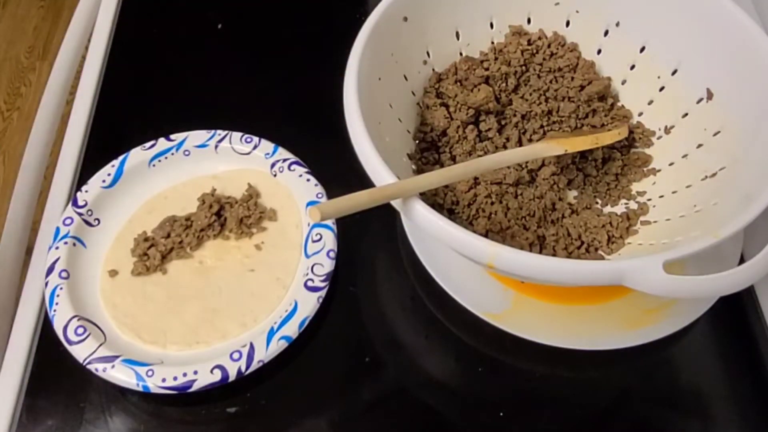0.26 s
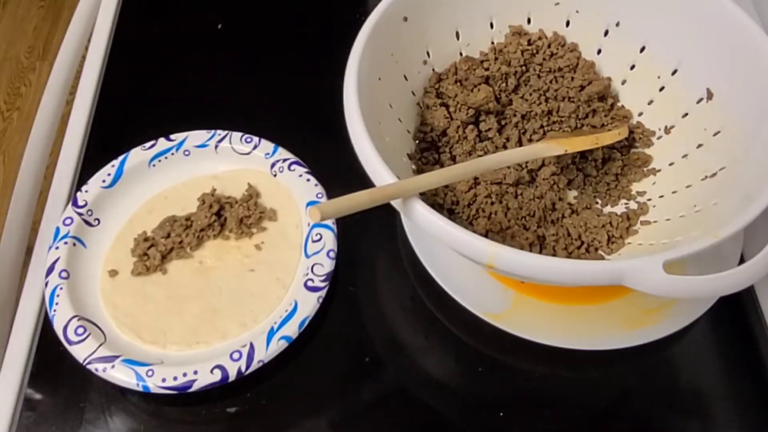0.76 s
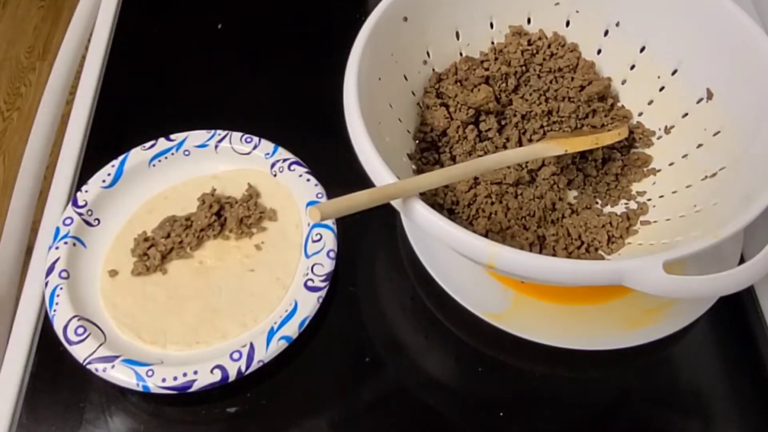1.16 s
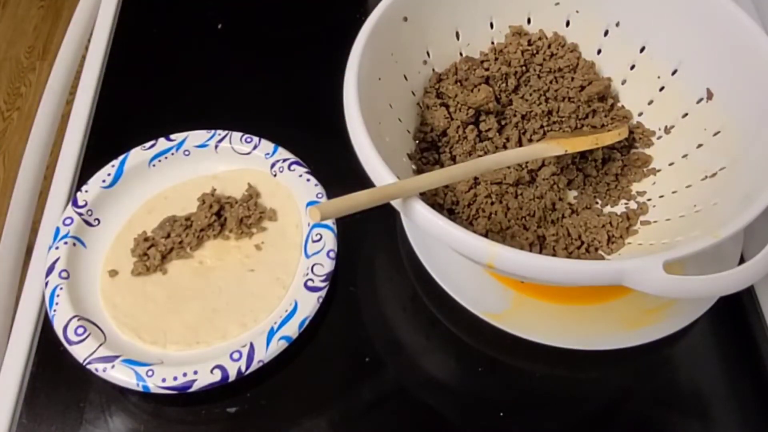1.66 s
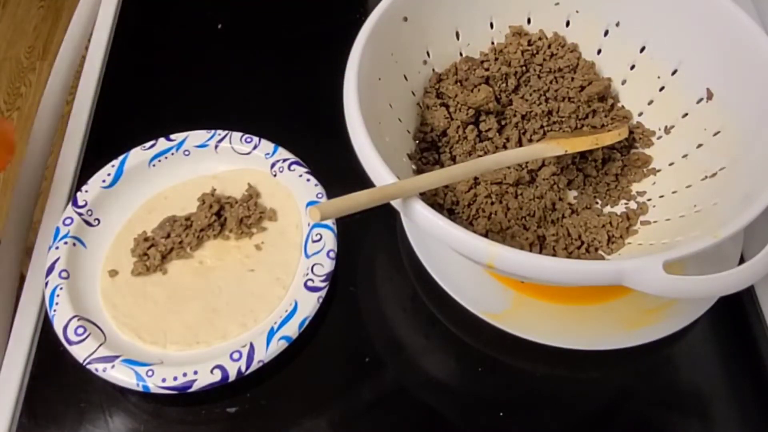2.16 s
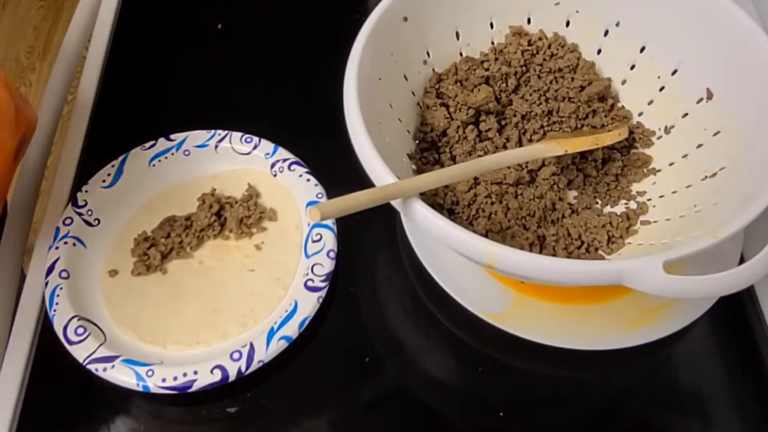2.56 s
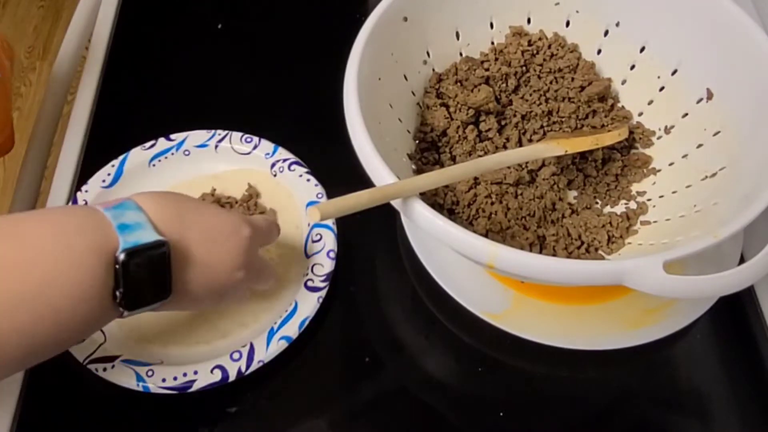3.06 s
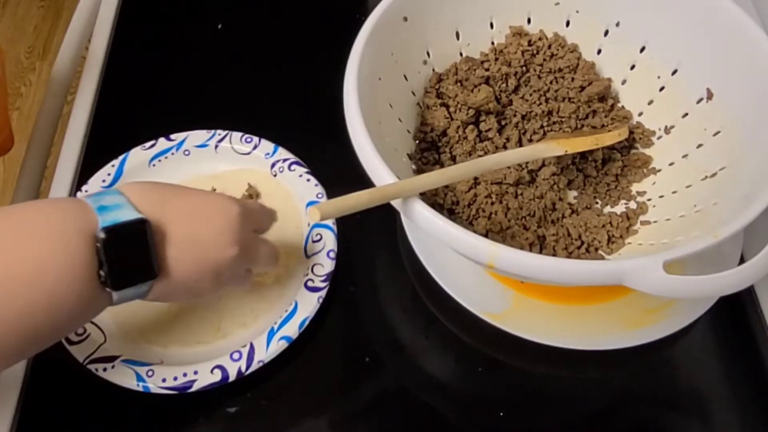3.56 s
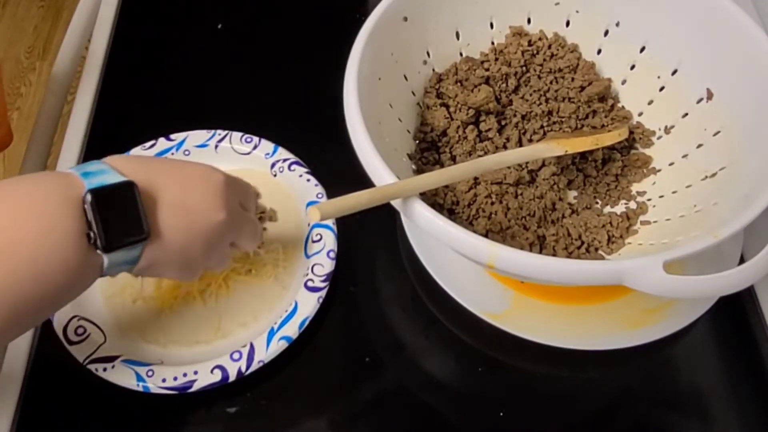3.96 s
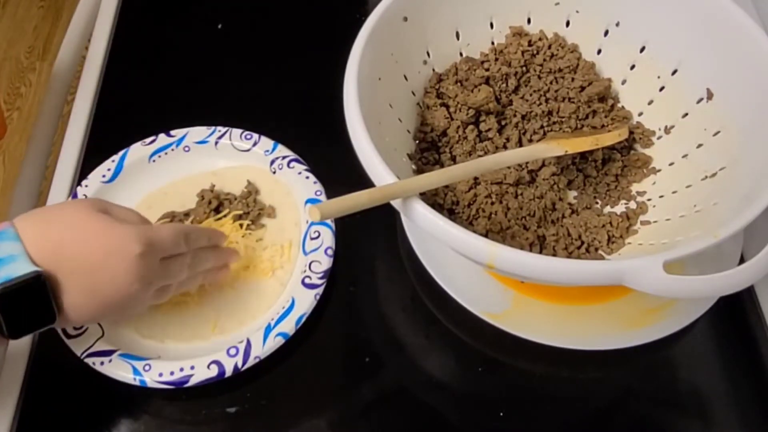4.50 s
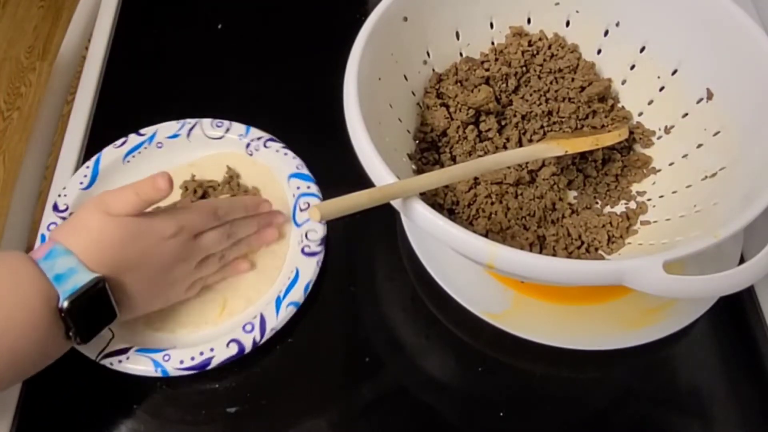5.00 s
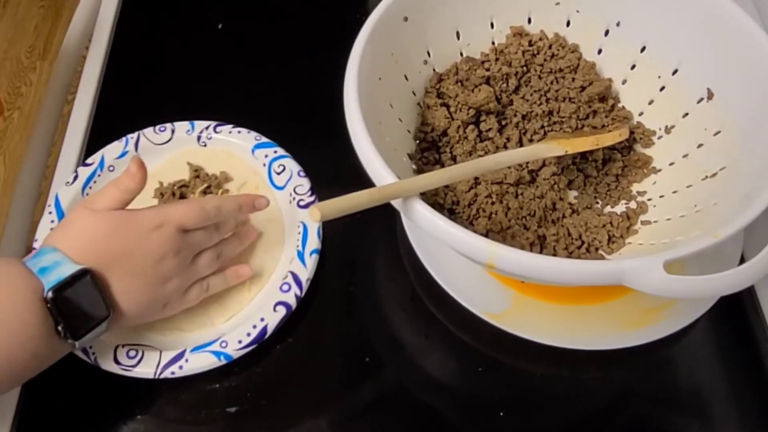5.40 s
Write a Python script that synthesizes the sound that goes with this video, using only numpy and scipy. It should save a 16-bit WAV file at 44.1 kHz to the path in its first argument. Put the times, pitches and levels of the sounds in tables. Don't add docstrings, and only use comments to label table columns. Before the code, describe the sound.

A plastic bag crackles and pops in a kitchen, soft finger pats land on a paper plate, then a heavy thud with rattling.

```python
import sys
import numpy as np
from scipy import signal
from scipy.fft import rfft, irfft
from scipy.io import wavfile
from scipy.ndimage import uniform_filter1d

SR = 44100
rng = np.random.default_rng(int(sys.argv[2]) if len(sys.argv) > 2 else 0)


def log_audio(samples):
    frames = np.atleast_2d(samples).T
    limited = np.clip(frames, -1, 1)
    pcm = np.round(limited * 32767).astype(np.int16)
    wavfile.write(sys.argv[1], SR, pcm)


def amplitude_ratio(level_db):
    exponent = np.asarray(level_db, float) / 20
    return 10 ** exponent


N = 248724

# pitch_hz, level_db (per Hz)
FAN_HISS = [(40, -19), (150, -3.5), (260, -9.5), (345, -10.5), (800, -0.5), (1050, -1.5), (1400, -5),
            (1750, -10), (2400, -1), (3100, -5), (5400, -4.5), (7750, -7.5), (10500, -6), (12100, 1.5),
            (15200, -6.5)]
# time_s, level_db
FAN_LEVEL = [(0.0, -49), (1.1, -48), (2.09, -47), (2.4, -49), (3.3, -50), (3.55, -51.5), (5.64, -51)]
# pitch_hz, level_db (per Hz)
FAN_HUM = [(18, -63), (30, -74), (54, -60), (91, -57), (122, 3.5), (145, 18), (183, -14.5), (221, -1),
           (260, -50), (340, -54), (570, -120)]
# pitch_hz, fade_60db_s
ROOM_FADE = [(100, 0.26), (1000, 0.17), (4000, 0.25), (15000, 0.043)]
# pitch_hz, likeness (0 to 1), right_lag_radians
MIC_LIKENESS = [(60, .995, 0), (700, .9, .2), (1030, .72, .5), (1400, .46, 1.3), (1750, .28, 1.7),
                (2050, .62, 2.9), (2400, .7, 3.1), (2800, .6, 3.3), (3400, .12, 5), (5200, .36, 6.3),
                (7700, .08, 10), (10300, .25, 14.2), (12000, .45, 17), (15000, .15, 21)]
# pitch_hz, left_minus_right_db
MIC_TILT = [(60, -1), (110, -0.5), (200, -0.5), (380, 5.5), (700, 1.5), (1290, -0.5), (2380, 4.5),
            (4400, 2.5), (8120, 6.5), (15000, 2.5)]
# start_s, level_db, contact_s
BLOWS = [
    (5.3231, -13, 0.002),
    (5.3275, -14.5, 0.00048),
    (5.329, -11.5, 0.01),
    (5.339, -7, 0.0047),
    (5.357, -27, 0.0013),
]
# pitch_hz, level_db, fade_60db_s
COUNTER_TONES = [(61.2, 6.5, 0.11), (53.8, -14, 0.74), (94, 10.5, 0.077), (125, -10.5, 0.35),
                 (150, 5, 0.088), (227, -10, 0.15), (227, -10.5, 0.085), (310, 0.5, 0.033),
                 (347, -12, 0.049), (557, -7, 0.12), (660, -8, 0.081), (793, 12.5, 0.025)]
# start_s, peak_db, low_pitch_hz, high_pitch_hz, fade_60db_s
RATTLES = [(5.283, -34, 2290, 3560, 0.14), (5.3232, -21.5, 2330, 6100, 0.043),
           (5.3279, -30, 4100, 2560, 0.1), (5.335, -36, 2100, 5030, 0.044),
           (5.3564, -26, 1800, 5160, 0.021), (5.378, -37, 2080, 6650, 0.096),
           (5.4034, -32.5, 3600, 8200, 0.03), (5.4182, -31.5, 3570, 6600, 0.1),
           (5.439, -43, 3950, 4600, 0.035), (5.459, -33, 4250, 7100, 0.087),
           (5.4684, -37, 4020, 4460, 0.035)]
# start_s, peak_db, pitch_hz, fade_60db_s
PATS = [(1.149, -44.5, 130, 0.028), (1.176, -44, 154, 0.12), (1.539, -47, 166, 0.0081),
        (1.681, -46.5, 227, 0.09), (1.796, -41, 153, 0.25), (1.831, -39, 91.5, 0.027),
        (1.829, -45, 164, 0.1), (1.848, -36.5, 173, 0.037), (1.87, -42, 91.5, 0.068),
        (2.911, -48.5, 192, 0.031), (2.968, -48, 121, 0.061), (3.02, -44.5, 149, 0.27),
        (3.063, -61, 144, 0.036)]
# start_s, peak_db, pitch_hz, fade_60db_s
TAPS = [(1.819, -36, 452, 0.021), (1.841, -36.5, 610, 0.035), (1.946, -37.5, 1107, 0.066),
        (2.888, -40, 706, 0.062), (2.969, -42, 753, 0.068), (3.019, -32, 1040, 0.037),
        (3.044, -32.5, 1020, 0.025), (3.055, -45, 875, 0.04), (3.068, -43.5, 960, 0.042),
        (3.094, -51, 850, 0.037), (3.158, -48, 1030, 0.04), (3.779, -43, 726, 0.017)]
# high_ring_db, scratch_db, fizz_db
CLICKS = [(4.363, -47, -31, 22, 31.5), (4.368, -50.5, -13, 20, 19), (4.437, -49.5, -7, 24, 24),
          (4.443, -65, 18, -1.1, -2.2), (4.492, -45.5, 5, 7, -12), (4.532, -52, -7, 19.5, 25.5),
          (4.538, -53.5, 9, 24, 31), (4.573, -58.5, -9, 24, 31.5)]
CASE_TONES = 1021, 820, 1561, 1513
# start_s, hold_s, force_db, dull_part_db (against the force)
SQUEEZES = [(.002, 0.007, -72, -12), (0.1, 0.069, -60, -3), (0.33, 0.032, -49, -10),
            (.552, 0.0062, -54, -27), (0.723, 0.023, -41, -16), (0.904, 0.37, -51.5, -20),
            (1.127, 0.035, -30, -5), (1.246, 0.0074, -40.5, -2.5), (1.281, 0.02, -42, -4.5),
            (1.43, .008, -45.5, -3), (1.483, 0.0088, -41, 3.5), (1.533, .006, -36, -7),
            (1.653, 0.01, -35, -5.5), (1.693, 0.085, -52.5, 1), (1.866, 0.058, -49.5, -15),
            (1.998, 0.013, -42, -2)]
# pitch_hz, level_db (per Hz)
FILM_TONE = [(120, -41), (200, -22), (409, -101), (933, 7.5), (1160, -14.5), (2290, 17.5), (2800, 15.5),
             (2960, -26), (3430, 13), (11900, -4.5), (16000, 6)]
# start_s, peak_db, pitch_hz, spatter_db (against the crack)
TICKS = [(.0074, -31, 12000, -3), (.162, -22, 2430, -12), (.331, -27, 9000, -15), (.3557, -25.5, 13800, -7),
         (.4016, -28, 12300, -8), (.419, -28, 12300, -4), (.7055, -23, 9900, -2), (.727, -14, 7250, -11),
         (.7444, -31, 9250, -13), (.9782, -29.5, 4030, -7), (1.0278, -24.5, 4130, -4),
         (1.045, -23.5, 5190, -11), (1.1764, -16.5, 2600, -6), (1.2724, -34, 12400, -7),
         (1.2857, -27, 2150, -8), (1.3015, -19.5, 6980, -8), (1.4267, -21, 4030, -10),
         (1.4655, -12, 10600, -16), (1.4921, -13, 7560, -8.5), (1.5023, -17, 7050, -31),
         (1.662, -18.5, 13300, -1), (1.7265, -18, 12300, -10), (1.7624, -30, 5000, 12),
         (1.7959, -20.5, 11800, -11), (1.8988, -21.5, 5800, -24), (1.9998, -14, 9300, -23),
         (2.0155, -23, 7000, -19), (2.0872, -17.5, 7100, -13), (2.1816, -25.5, 12800, -9),
         (2.4618, -33, 2500, -6)]
# start_s, peak_db, pitch_hz, spatter_db (against the crack)
POPS = [(.1297, -27.5, 3850, -9), (.2332, -28.5, 3900, -4), (.2822, -27.5, 4000, -19),
        (.3381, -21.5, 3720, -15), (.5587, -29.5, 7500, 6), (.7566, -26, 11600, -20),
        (.7934, -26.5, 4370, -27), (.8732, -32, 6990, -13), (.9078, -26, 12100, 9),
        (1.086, -26.5, 3580, -14), (1.1259, -19.5, 12200, 5), (1.1377, -21, 6620, 7),
        (1.1564, -19, 5400, 2), (1.167, -19, 3500, -11), (1.2508, -25.5, 5270, 3), (1.5314, -22, 6200, -9),
        (1.5447, -24, 5680, -10), (1.5651, -26, 2080, -8), (1.6366, -23.5, 6660, 5),
        (1.6945, -29.5, 2200, -23), (1.703, -24, 2380, 6), (1.8723, -29, 9000, -9),
        (1.979, -27.5, 2320, -9), (2.0945, -25, 7400, -4.5), (2.13, -32, 6740, -17), (2.153, -26, 6200, -4),
        (2.213, -27.5, 5760, -10), (2.2431, -24, 1970, -0.5), (2.292, -29, 5500, -4),
        (2.3472, -29.5, 3120, -7)]


def evened(x):
    return x / np.sqrt(np.mean(x ** 2) + 1e-20)


def peaked(x):
    return x / (abs(x).max() + 1e-12)


def read(points, hz, column=1):
    columns = np.transpose(points)
    return np.interp(np.log(hz + 1), np.log(columns[0] + 1), columns[column])


def add(mix, start_s, sound):
    part = mix[round(start_s * SR):][:len(sound)]
    part += sound[:len(part)]


def band(x, low_hz, high_hz):
    edges = [low_hz, min(high_hz, SR / 2.1)]
    return signal.sosfilt(signal.butter(2, edges, "band", fs=SR, output="sos"), x)


def ring(hz, fade_s, size):
    t = np.arange(size) / SR
    return np.sin(2 * np.pi * hz * t) * amplitude_ratio(-60 * t / fade_s)


def burst(noise, hz, spread, fade_s, spatter_db=0.):
    t = np.arange(noise.shape[-1]) / SR
    rise_s = .0006
    spatter = noise * amplitude_ratio(spatter_db - 60 * t / fade_s) * np.minimum(t / rise_s, 1)
    crack = np.sign(noise) * amplitude_ratio(-60 * abs(t - rise_s) / .001)
    return peaked(band(spatter + crack, hz / spread, hz * spread))


def ports(first, second):
    hz = np.fft.rfftfreq(N, 1 / SR)
    same = read(MIC_LIKENESS, hz)
    tilt = amplitude_ratio(read(MIC_TILT, hz) / 2)
    late = np.exp(-1j * read(MIC_LIKENESS, hz, column=2))
    a, b = rfft(first), rfft(second)
    left = a * tilt
    right = (same * late * a + np.sqrt(1 - same ** 2) * b) / tilt
    return irfft([left, right], N)


def kitchen(x):
    size, gap = SR // 2, 20
    taps = np.zeros((2, size))
    at = np.arange(60, size - gap, gap) + rng.integers(0, gap, (2, (size - 61) // gap))
    np.put_along_axis(taps, at, rng.choice([-1., 1.], at.shape), 1)
    hz, t, z = signal.stft(taps, SR, nperseg=256)
    fade = amplitude_ratio(-60 * t / read(ROOM_FADE, hz)[:, None])
    tail = signal.istft(z * fade, SR, nperseg=256)[1]
    return signal.fftconvolve(x[None], tail / np.linalg.norm(tail[0]), axes=1)[:, :N]


def haze(spectrum, patchy_db):
    frames, hz = N // 512 + 5, np.fft.rfftfreq(2048, 1 / SR)
    a, b, c, d, patches = rng.standard_normal((frames, 1025, 5)).T
    patches = uniform_filter1d(patches, 20, 0)
    patches = evened(uniform_filter1d(patches, 8, 1))
    level = amplitude_ratio(read(spectrum, hz)[:, None] + patchy_db * patches)
    z = np.array([a + 1j * b, c + 1j * d]) * level
    noise = signal.istft(z, nperseg=2048, noverlap=1536)[1][:, :N]
    return ports(*evened(noise))


def fan():
    time_s, level_db = np.transpose(FAN_LEVEL)
    hiss = haze(FAN_HISS, 1.64) * amplitude_ratio(np.interp(np.arange(N) / SR, time_s, level_db) + 2.0)
    hum = haze(FAN_HUM, 1.5) * amplitude_ratio(-62.5)
    return hiss + hum


def knock():
    out, noise = np.zeros(N), rng.standard_normal((len(BLOWS), 16000))
    tones = sum(amplitude_ratio(db) * ring(hz, fade_s, 16000) for hz, db, fade_s in COUNTER_TONES)
    for (start_s, db, contact_s), a in zip(BLOWS, noise):
        push = np.sin(np.pi * np.minimum(np.arange(800) / SR / contact_s, 1))
        body = tones + amplitude_ratio(6.0) * burst(a, 350, 4.0, 0.26, 5.5)
        add(out, start_s, -amplitude_ratio(db) * peaked(signal.oaconvolve(body, push)))
    return band(out, 25, 3000)


def rattles():
    out, noise = np.zeros(N), rng.standard_normal((len(RATTLES), 3000))
    for (start_s, db, low_hz, high_hz, fade_s), a in zip(RATTLES, noise):
        low = burst(a, low_hz, 1.18, fade_s)
        high = amplitude_ratio(-3.5) * burst(a[::-1], high_hz, 1.15, fade_s)
        tick = 0.68 * burst(-a, 2700, 5.9, 0.12, -8.5)
        add(out, start_s, amplitude_ratio(db) * (low + high + tick))
    return band(out, 96, 25000)


def pats_and_taps():
    touches = PATS + TAPS
    out, noise = np.zeros(N), rng.standard_normal((len(touches), 3000))
    for (start_s, db, hz, fade_s), a in zip(touches, noise):
        brush = 0.99 * burst(a, hz, 1.53, fade_s, 16.0)
        add(out, start_s, amplitude_ratio(db) * peaked(ring(hz, fade_s, 3000) + brush))
    return band(out, 96, 25000)


def clicks():
    out, noise = np.zeros(N), rng.standard_normal((len(CLICKS), 3000))
    low, low_partner, high, high_partner = (ring(hz, 0.09, 3000) for hz in CASE_TONES)
    for (start_s, db, high_db, scratch_db, fizz_db), a in zip(CLICKS, noise):
        case = low + .7 * low_partner + amplitude_ratio(high_db) * (high + .6 * high_partner)
        knock_in = 4.3 * burst(a[::-1], 1210, 1.33, 0.06, 3.)
        scratch = amplitude_ratio(scratch_db) * burst(a, 3900, 1.9, .04, -2.)
        fizz = amplitude_ratio(fizz_db) * burst(a, 11000, 1.5, .04, -4.)
        add(out, start_s, amplitude_ratio(db) * (case + knock_in + scratch + fizz))
    return out


def squeeze(t):
    grip_s, let_go_db_per_s = 0.003, 356
    put_down_s, settle_db_per_s = 2.48, 93
    held = amplitude_ratio(-60 - settle_db_per_s * np.maximum(t - put_down_s, 0))
    start, hold, force_db, dull_db = np.transpose(SQUEEZES)[:, :, None]
    grip = np.clip((t - start) / grip_s, 0, 1)
    since_let_go = np.maximum(t - start - grip_s - hold, 0)
    force = grip * amplitude_ratio(force_db - let_go_db_per_s * since_let_go)
    bright = held + force.sum(0)
    dull = held * amplitude_ratio(1.9) + (force * amplitude_ratio(dull_db)).sum(0)
    return bright, dull


def crumple():
    t, hz = np.arange(N) / SR, np.fft.rfftfreq(N, 1 / SR)
    happens = rng.random(N) < 3600 / SR
    size = amplitude_ratio(3.5 * np.minimum(rng.exponential(1, N), 4)) * happens
    kind = rng.integers(0, 10, N)
    shapes = rng.standard_normal((10, 2, 60)) * amplitude_ratio(-.6 * np.arange(60))
    cracks = np.zeros((2, N))
    for k, shape in enumerate(shapes):
        cracks += signal.oaconvolve((size * (kind == k))[None], shape, axes=1)[:, :N]
    cracks = irfft(rfft(cracks) * amplitude_ratio(read(FILM_TONE, hz)), N)
    coarse = t[::32]
    bright, dull = (np.interp(t, coarse, part) for part in squeeze(coarse))
    return evened(band(cracks, 6600, 17700)) * bright + evened(band(cracks, 710, 2150)) * dull


def snaps(rows, body_db):
    out, noise = np.zeros((2, N)), rng.standard_normal((len(rows), 2, 2, 2500))
    for (start_s, db, hz, spatter_db), (a, b) in zip(rows, noise):
        pan_db = 1 + 4.5 * a[0, 0]
        crack = burst(a, hz, 1.8, .04, spatter_db)
        sizzle = .6 * burst(b, 9000, 2.2, .03, spatter_db)
        body = amplitude_ratio(body_db) * burst(b, 1470, 2.41, 0.078, spatter_db + 5.0)
        left, right = crack + sizzle + body
        add(out[0], start_s, amplitude_ratio(db + (pan_db - 1.0) / 2) * left)
        add(out[1], start_s, amplitude_ratio(db - (pan_db - 0.5) / 2) * right)
    return out


def scene():
    bag = crumple() + snaps(TICKS, -18) + snaps(POPS, -7.5)
    things = rattles() + pats_and_taps() + clicks()
    skim = rng.standard_normal(130) * amplitude_ratio(-.12 * np.arange(130))
    scattered = signal.oaconvolve(things, skim / np.linalg.norm(skim))[:N]
    direct = ports(bag[0] + things, bag[1] + scattered)
    echo = amplitude_ratio(-10.0) * ports(*kitchen(bag[0] + things))
    thud = knock()
    thud_sides = thud * amplitude_ratio([[-.2], [.2]])
    thud_echo = amplitude_ratio(-14.) * ports(*kitchen(thud))
    return direct + echo + fan() + thud_sides + thud_echo


def roll_off(x):
    return signal.sosfilt(signal.butter(12, 16460, fs=SR, output="sos"), x)


def record(dry):
    treble_cut = signal.firwin(255, 15450, window=("kaiser", 7), fs=SR)
    bass_cut = signal.butter(3, 42, "high", fs=SR, output="sos")
    mix = signal.oaconvolve(signal.sosfilt(bass_cut, dry), treble_cut[None], "same")
    return roll_off(mix)


dry = scene()
out = record(dry)
log_audio(out)
```